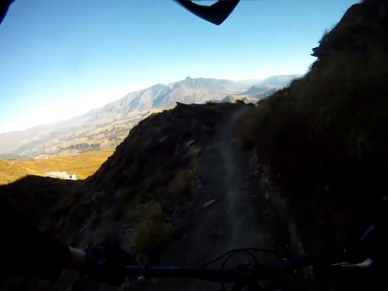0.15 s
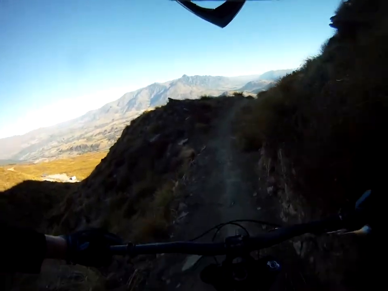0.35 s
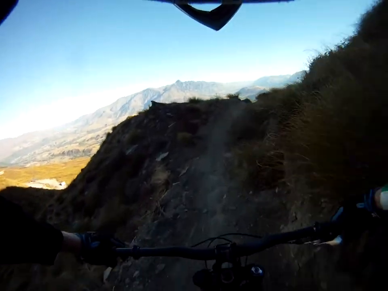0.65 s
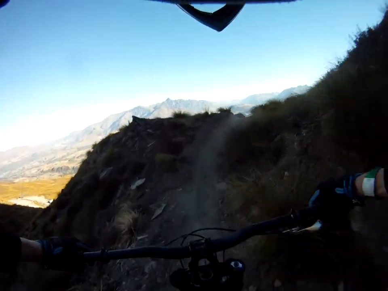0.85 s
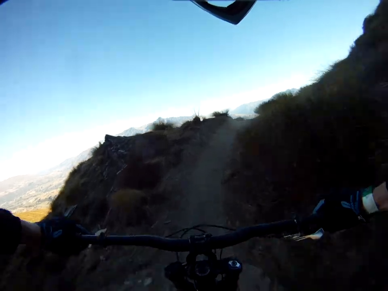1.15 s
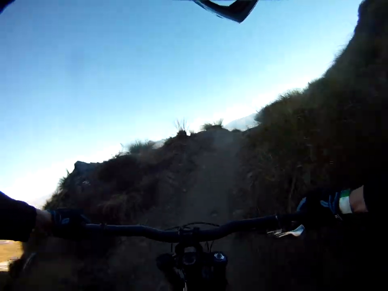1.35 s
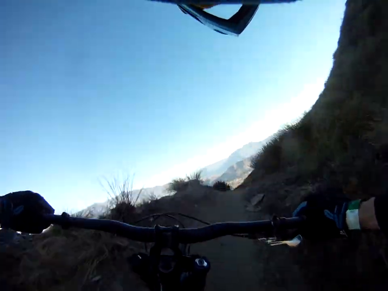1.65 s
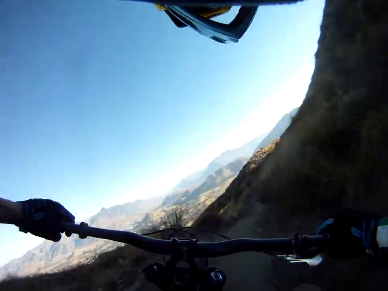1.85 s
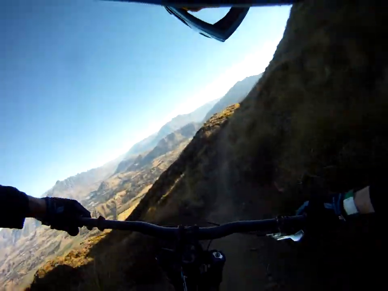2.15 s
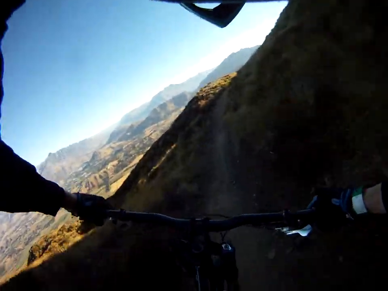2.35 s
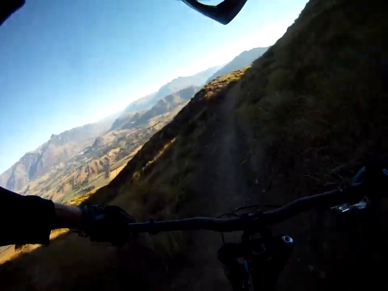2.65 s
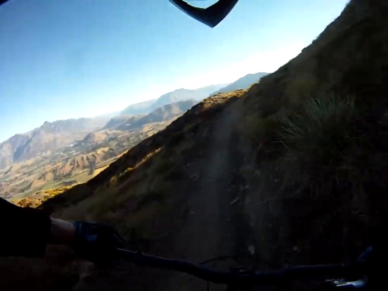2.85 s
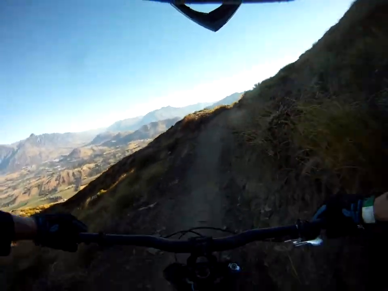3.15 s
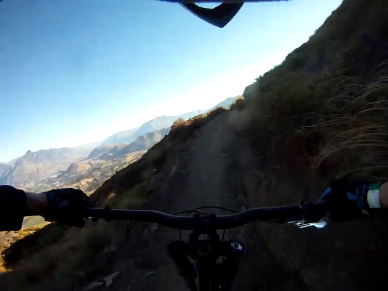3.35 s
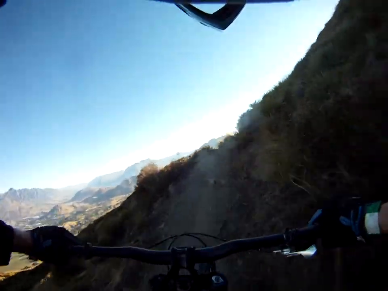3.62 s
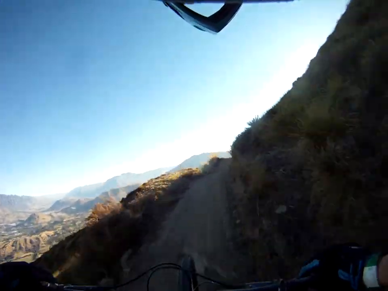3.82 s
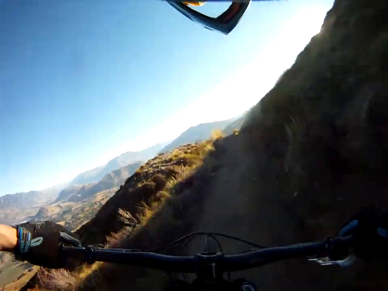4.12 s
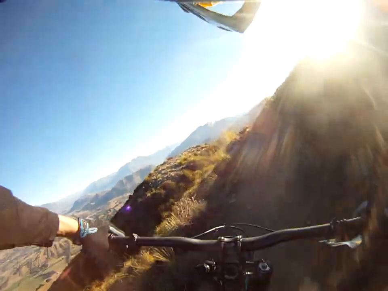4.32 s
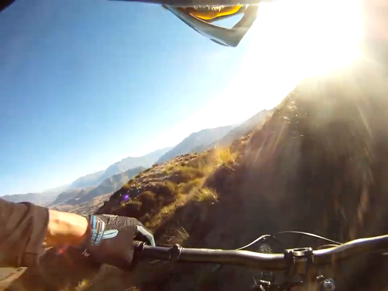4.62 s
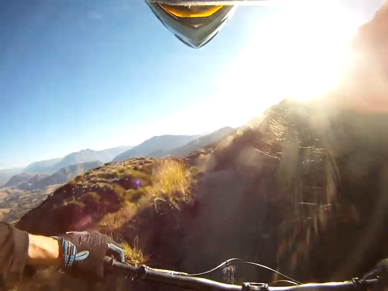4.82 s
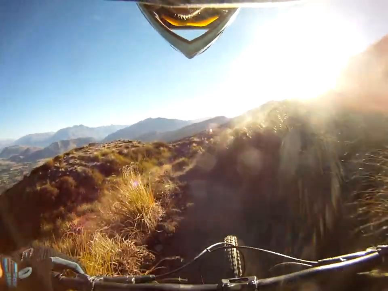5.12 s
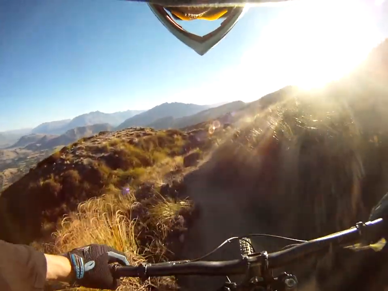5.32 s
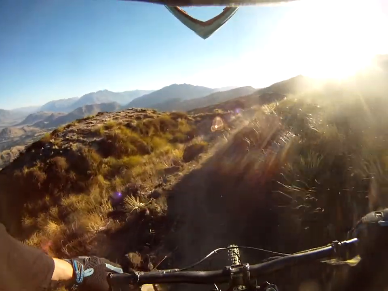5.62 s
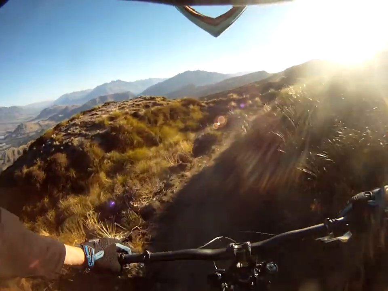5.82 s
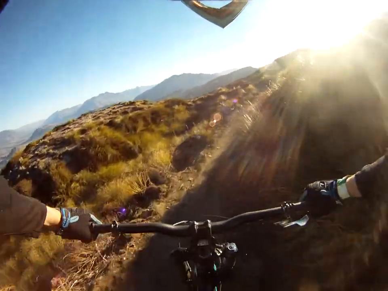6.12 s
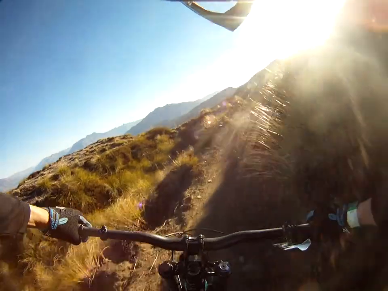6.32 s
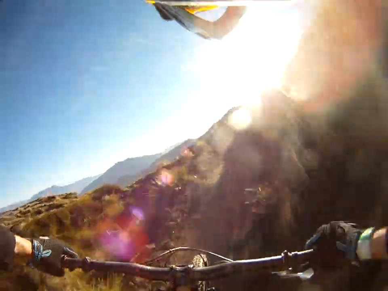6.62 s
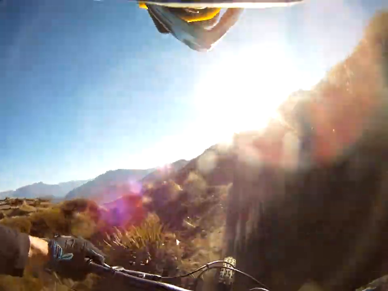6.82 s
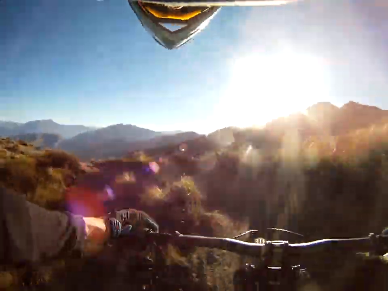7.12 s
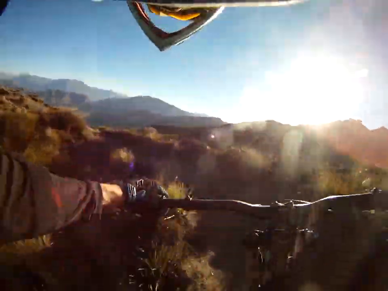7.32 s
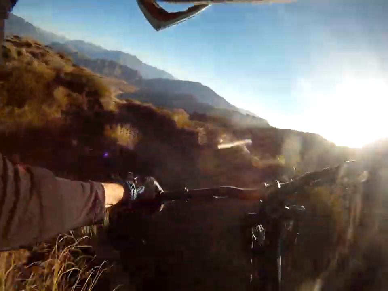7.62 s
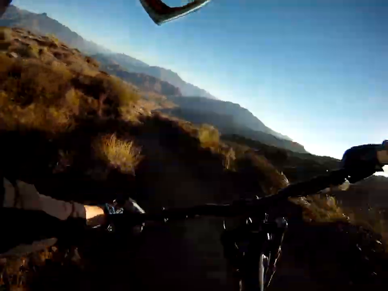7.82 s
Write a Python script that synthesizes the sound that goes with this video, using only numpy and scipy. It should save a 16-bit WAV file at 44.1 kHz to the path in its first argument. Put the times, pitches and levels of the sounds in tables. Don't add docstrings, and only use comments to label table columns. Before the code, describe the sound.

A mountain bike rushes down a dry dirt trail, wind thumping a boxed-in microphone while tyres rumble and crunch over grit and rattling stones.

```python
import sys
import numpy as np
from scipy import signal
from scipy.fft import rfft, irfft, next_fast_len
from scipy.io import wavfile
from scipy.ndimage import uniform_filter1d

SR = 44100
rng = np.random.default_rng(int(sys.argv[2]) if len(sys.argv) > 2 else 0)


def linear_from_db(decibels):
    return 10 ** (np.asarray(decibels, float) / 20)


def persist_wave(psi):
    counts = np.round(np.clip(psi, -1, 1) * 32767).astype(np.int16)
    wavfile.write(sys.argv[1], SR, np.atleast_2d(counts).T)


N = 351458

# pitch in Hz, level in dB, time to fade 60 dB in seconds.
WALL_MODES = [
    [(1033, 5.5, 0.0051), (1214, 0, 0.017), (1356, -5, 0.014), (1660, -3, 0.011)],
    [(1855, 0, 0.009), (2150, 4, 0.011), (2320, 1, 0.014), (2660, 4, 0.0087), (3110, -5.5, 0.017)],
    [(3500, 5.5, 0.0066), (3790, 1.5, 0.011), (4100, 0, 0.011), (4340, -6, 0.0079)],
]
# frequency in Hz, level in dB per Hz.
WIND_TONE = [(8.8, -26), (15, 0.5), (75, 5), (183, -6), (222, -10.5), (400, -19.5), (520, -29), (880, -120)]
# frequency in Hz, level in dB per Hz.
RUMBLE_TONE = [(71, -39), (120, -7), (264, -5), (312, -6.5), (419, -7), (655, -15.5), (781, -25.5),
               (1100, -30.5), (1430, -35), (2420, -120)]
# frequency in Hz, level in dB per Hz.
CRUNCH_TONE = [(470, -37), (800, -12), (965, -19), (1050, -12.5), (1170, -7), (1320, -11.5), (1750, -11.5),
               (2430, -8.5), (3010, 0), (3920, -15), (4200, -18.5), (5460, -19.5), (9240, -120)]
# frequency in Hz, level in dB per Hz.
DUST_TONE = [(2240, -13), (3800, -6), (4330, -1), (4770, 5), (5220, -9), (6000, -4), (7800, -42),
             (13200, -120)]
# time in seconds, wind pressure in dB.
AIRSPEED = [(0.0, -24), (.3, -21.5), (.62, -21.5), (1.2, -17.5), (1.5, -22.5), (1.95, -21), (2.1, -28),
            (2.5, -24.5), (3.0, -21.5), (3.5, -17.5), (3.95, -23), (4.45, -34), (4.65, -26.5), (5.85, -29),
            (6.17, -23), (6.6, -25.5), (7.05, -33.5), (7.97, -33)]
# centre in seconds, half length in seconds, swell in dB.
GUST_SWELLS = [(.03, 0.04, -4), (.17, 0.079, 5), (.62, 0.093, 5.5), (.83, 0.034, -9), (1.06, 0.031, 0),
               (1.11, .02, -6), (1.18, 0.075, 4), (1.24, 0.037, -1), (1.7, 0.085, -11), (1.89, 0.075, 2),
               (2.05, 0.043, -4.5), (2.4, 0.031, -4), (2.47, .06, 4), (2.57, 0.064, -2), (2.66, .05, 1),
               (2.82, 0.055, 4), (2.96, 0.053, -4), (3.04, 0.034, 4), (4.18, 0.04, -9), (4.28, .04, 6),
               (3.95, .1, -3), (2.3, .08, 2), (3.72, .05, -4), (4.33, .04, -8), (4.64, 0.047, 8),
               (5.27, 0.044, -9), (6.19, 0.025, -9), (6.26, .04, 5.5), (6.57, .02, -6), (6.68, .07, 5.5),
               (7.46, 0.043, -8), (7.57, 0.076, -2), (7.93, .05, 12)]
# time in seconds, load on the tyres in dB, looseness of the dirt in dB.
GROUND = [(0.0, -36, -49), (.3, -30, -42.5), (.65, -31.5, -43.5), (1.0, -29.5, -43.5), (1.6, -29, -43),
          (1.85, -35.5, -48.5), (2.1, -40, -52.5), (2.5, -34.5, -51.5), (2.8, -32, -50),
          (3.1, -30.5, -42.5), (3.66, -28.5, -44.5), (4.05, -34.5, -48), (4.9, -35, -48),
          (5.3, -39.5, -49.5), (5.85, -42.5, -52.5), (6.5, -29, -43.5), (7.3, -40, -51.5), (7.97, -35, -48)]
# centre in seconds, half length in
# seconds, extra rumble in dB, extra grit in dB.
STONES_HIT = [(.03, 0.045, 0.5, -3.5), (.09, .03, 7, 1), (.13, 0.032, 2, -8), (.21, 0.028, 3.5, 3),
              (.3, 0.037, 1.5, -0.5), (.62, 0.099, -2.5, -3), (.85, 0.043, 3.5, 3.5),
              (1.11, 0.015, 6, -4.5), (1.215, 0.024, 3.5, 7.5), (1.28, 0.026, 0, 3), (1.62, .05, 1.5, -1),
              (1.86, 0.02, -1, 9), (2.33, .05, -1.5, -1), (2.42, 0.077, 3, 3.5), (2.55, .03, -3, -4),
              (2.6, 0.052, -1.5, 5), (3.02, .08, 6, 0.5), (.33, .03, 0, -3), (2.33, .04, 4, 0),
              (2.75, .1, 0, 2), (3.975, .025, -3, -6), (4.13, .04, -10, 0.5), (4.24, .02, -2, -4),
              (4.325, .03, 0, 5), (4.367, .012, 0, -5), (4.54, .012, 0, -5), (6.41, .02, 0, -3),
              (6.69, .03, 0, -3), (7.03, .05, 3, 3), (7.265, .02, 0, -4), (4.185, .035, 9, 2.5),
              (4.28, 0.059, 5.5, 5.5), (4.46, 0.064, -1.5, 3.5), (4.59, 0.064, -5, -1),
              (4.93, 0.066, 2, 3.5), (5.02, 0.044, -1, 4.5), (5.29, 0.022, 2, 5), (5.46, 0.084, 0.5, 3),
              (6.275, .025, -2.5, 7.5), (6.46, 0.028, 0, 2), (6.6, .08, 7, 5), (7.46, .04, 1, 4.5)]
# start in seconds, thud level in dB, thud pitch in Hz,
# sharpness (tick over thud) in dB.
MOUNT_THUDS = [(.014, -20.5, 630, -13), (.0905, -22, 600, -8), (.209, -24.5, 450, -11),
               (.254, -21.5, 554, -15), (.89, -20.5, 480, -9), (2.099, -29, 510, -4),
               (2.17, -34.5, 744, -18), (2.25, -29.5, 434, -22), (2.84, -24, 510, -10),
               (3.507, -29, 620, -10), (3.904, -31, 524, -4), (4.085, -36, 756, -1), (4.19, -23, 530, -9),
               (4.299, -26, 634, -18), (4.3205, -15, 497, -22), (4.444, -27.5, 480, -16),
               (4.572, -31, 510, -7), (5.241, -22.5, 645, -10.5), (5.476, -27, 463, -21),
               (5.668, -33.5, 805, -21), (5.912, -27.5, 804, -4.5), (6.095, -26, 743, -12),
               (6.491, -25, 570, -11), (6.521, -13.5, 626, -14), (6.885, -30, 535, -8),
               (6.978, -33, 664, -6), (7.072, -23, 640, -13), (7.228, -19.5, 643, -10.5),
               (7.498, -18, 640, -8), (7.8, -28, 530, -24)]
# start in seconds, tick level in dB, clack over tick in dB,
# snap over tick in dB.
WALL_RAPS = [(.133, -33, -2, 1), (1.286, -29.5, 0.5, 5), (2.085, -18.5, -4.5, -17), (3.025, -29, -18, -10),
             (3.674, -40, 0, 8), (3.999, -28, -3, -14), (4.044, -31, -5, 1.5), (4.262, -27, -3, -6),
             (4.549, -15.5, -6.5, -13), (4.788, -34, -9, -14), (4.827, -32, -20, -16),
             (4.892, -31, -19, -3), (5.05, -36, -16, -2), (5.747, -26.5, -2, -28), (6.431, -22, -10, -5),
             (6.567, -18, -9, -8), (6.5735, -9, -7, 5), (6.589, -29, -11, -17), (6.6125, -23, -16, -12)]
# start in seconds, snap level in dB, tick over snap in dB.
CABLE_FLICKS = [(.155, -30, -8), (.171, -33, -8), (.238, -34, -6), (.288, -30, -8), (1.19, -30, -10),
                (1.861, -30.5, -5.5), (3.313, -30, -13), (4.379, -37, -9), (5.284, -42, 2),
                (6.268, -27, -9), (6.46, -31, -11), (7.449, -41, -11)]
# start in seconds, level in dB, centre in Hz, width in Hz,
# length in seconds.
LOOSE_SCRAPES = [(0.151, -41.5, 3900, 2500, 0.027), (0.256, -42, 4800, 2500, .014),
                 (.286, -35, 4500, 2400, 0.009), (0.816, -41, 5000, 2500, 0.048),
                 (1.459, -42, 3800, 3000, 0.054), (2.97, -37, 2600, 895, 0.018),
                 (2.993, -39, 2600, 700, 0.015), (3.042, -37, 2500, 1300, 0.017),
                 (4.188, -43, 4400, 1400, .012), (4.257, -41, 2780, 2000, 0.032),
                 (6.514, -33.5, 2940, 2500, .02), (6.576, -27, 2630, 2800, 0.011),
                 (6.566, -25, 2900, 2600, 0.0084), (6.588, -31, 2500, 1400, 0.011),
                 (6.593, -39, 2480, 2500, 0.043)]
# start in seconds, peak level in dB.
PEBBLE_CRACKS = [(0.0902, -24), (0.9158, -21), (1.1887, -25), (1.2126, -28), (1.286, -14), (1.3648, -17),
                 (1.4885, -27), (1.6302, -22), (2.2244, -34), (2.706, -22), (3.076, -26), (3.2824, -17),
                 (3.3244, -33), (3.5544, -31), (3.6726, -22), (3.7649, -15.5), (4.4568, -32), (5.1777, -33),
                 (6.432, -14), (6.449, -20), (6.4607, -12), (6.5344, -24), (6.6044, -17)]
# start in seconds, peak level in dB, pitch in Hz.
SHORT_PINGS = [(.091, -25, 2950), (.173, -26, 3000), (.209, -29, 2900), (.367, -27, 3200),
               (.387, -26, 3000), (.451, -28, 2900), (.519, -28, 3000), (1.144, -28, 3000),
               (1.212, -26, 3100), (1.286, -25, 3250), (3.791, -22, 3000), (4.044, -28, 1500),
               (4.262, -26, 1300), (6.574, -19, 1600), (6.612, -18.5, 1350), (3.999, -23, 2700),
               (4.087, -32, 1150), (3.676, -27, 3400), (6.978, -31, 1280), (7.136, -35, 1200),
               (.155, -27, 3200), (.238, -28, 3500), (.261, -30, 3000), (.489, -32, 3080),
               (.588, -31, 3030), (.65, -30, 3140), (.72, -30, 2900), (.788, -31, 3060),
               (.8435, -27, 3140), (.916, -27, 2940), (1.038, -30, 2690), (1.09, -31, 2890),
               (1.125, -31, 3070), (1.165, -29, 2800), (1.189, -28, 2960), (1.212, -30, 4600),
               (1.252, -31, 2800), (1.313, -27, 2760), (1.365, -29, 3420), (1.429, -30, 2670),
               (1.47, -29, 2290), (1.489, -27, 2700), (2.947, -31, 2760), (2.972, -27, 2380),
               (2.982, -30, 2900), (2.997, -26, 2240), (3.015, -27, 3200), (3.024, -23, 2740),
               (3.046, -29, 2700), (3.077, -29, 1300), (3.0945, -30, 2000), (3.141, -29, 2970),
               (4.126, -30, 3000), (4.283, -32, 3100), (4.572, -29, 1150), (6.519, -25, 2190),
               (6.594, -28, 2400), (6.605, -28, 2300), (6.63, -30, 2600), (6.679, -34, 2210)]
# start in seconds, peak level in dB, pitch in Hz.
HEAVY_JOLTS = [(0.207, -8.5, 56), (0.678, -20, 40.8), (0.859, -8, 79), (1.038, -4.5, 57.7),
               (1.998, -11.5, 48.4), (2.434, -14.5, 109), (2.648, -10, 86), (2.849, -23, 59.2),
               (3.498, -13.5, 202), (3.568, -10, 43.1), (3.998, -13.5, 182), (4.189, -9.5, 343),
               (4.319, -15, 70.0), (4.596, -13, 64), (5.051, -13, 323), (6.249, -19, 53.8),
               (6.4305, -13, 520), (6.492, -17, 300), (6.628, -17, 330), (4.163, -22, 420),
               (4.264, -20, 600), (4.287, -17, 150), (3.094, -16, 300), (7.757, -18, 260), (7.905, -17, 70)]
# start in seconds, level in dB, pitch in Hz, length in seconds.
BRAKE_SQUEAKS = [
    (1.563, -36.5, 962, 0.051),
    (6.456, -26, 966, 0.022),
    (6.483, -38, 966, .013),
]
SQUEAK_HARMONICS = [-8, -14, -1, -15, -14]


def wind():
    eddies = rng.standard_normal(N) * linear_from_db(1.7 * wander(5.8, 26.0))
    strength_db = 0.02 + curve(AIRSPEED, axis=1) + humps(GUST_SWELLS, axis=2)
    return linear_from_db(strength_db) * colour(eddies, WIND_TONE)


def tyres():
    sink = np.arange(N) * 150.0 / SR
    stones = np.maximum.accumulate(wander(2.6, 56.0) + sink) - sink
    stones = evened(stones - stones.mean())

    rumble = rng.standard_normal(N) * linear_from_db(0.99 * stones + 1.56 * wander(3.8, 72.0))
    rumble = colour(patchy(rumble, 2.03, frames=10, bins=2), RUMBLE_TONE)
    load_db = 2.5 + curve(GROUND, axis=1) + humps(STONES_HIT, axis=2)

    grains = linear_from_db(4.9 * np.minimum(rng.exponential(1, N), 5))
    grains = grains * (rng.random(N) < 900 / SR) * rng.choice([-1, 1], N)
    crunch = rng.standard_normal(N) + 0.24 * evened(grains)
    crunch = crunch * linear_from_db(2.2 * stones + 0.49 * wander(7.6, 62.0))
    crunch = colour(patchy(crunch, 1.8, frames=8, bins=6), CRUNCH_TONE)

    dust = rng.standard_normal(N) * linear_from_db(1.8 * stones + 2.2 * wander(6.5, 77.0))
    dust = colour(dust, DUST_TONE)
    dust_gain = loose_dirt(-8.5, stone_jump=1.64)
    return linear_from_db(load_db) * rumble + crunch_gain() * crunch + dust_gain * dust


def loose_dirt(offset_db, stone_jump):
    return linear_from_db(offset_db + curve(GROUND, axis=2) + stone_jump * humps(STONES_HIT, axis=3))


def crunch_gain():
    return loose_dirt(3.5, stone_jump=1)


def blows():
    rows = []
    for s, thud_db, thud_hz, sharp in MOUNT_THUDS:
        tick_db = thud_db + sharp
        rows.append((s, thud_db, thud_hz, tick_db - 2, tick_db, tick_db - 10))
    for s, tick_db, clack, snap in WALL_RAPS:
        rows.append((s, -18 + 0.4 * tick_db, 552, tick_db + clack, tick_db, tick_db + snap))
    for s, snap_db, tick in CABLE_FLICKS:
        rows.append((s, snap_db - 13, 497, snap_db - 17.0, snap_db + tick, snap_db))
    return rows


def knocks():
    out, t = np.zeros(N), np.arange(2000) / SR
    rows = blows()
    rattles = rng.standard_normal((len(rows), 400)) * linear_from_db(-60 * t[:400] / 0.015)
    contact = signal.windows.hann(9)
    slap_band = signal.butter(2, [900.0, 2800.0], "bandpass", fs=SR, output="sos")
    for (s, thud_db, thud_hz, *levels_db), rattle in zip(rows, rattles):
        blow = np.convolve(0.1 * rattle + signal.unit_impulse(400), contact)

        slap = signal.sosfilt(slap_band, blow)
        add(out, s, linear_from_db(levels_db[1] - 4.5) * -slap / abs(slap).max())

        thud = linear_from_db(-60 * t / 0.022) * np.sin(2 * np.pi * thud_hz * t)
        thud -= linear_from_db(-14.0 - 60 * t / 0.033) * np.sin(2 * np.pi * 870.0 * t)
        thud *= (1 - np.exp(-t / 0.0006)) ** 2
        add(out, s + 0.0002, linear_from_db(thud_db + 4.0) * thud / abs(thud).max())

        detune = 1 + 0.012 * np.clip(rattle[0], -2, 2)
        for family, level_db in zip(WALL_MODES, levels_db):
            ring = np.zeros(len(t))
            for k, (hz, db, t60) in enumerate(family):
                ring += (-1) ** k * linear_from_db(db - 60 * t / t60) * np.sin(2 * np.pi * hz * detune * t)
            ring = signal.fftconvolve(ring, blow)
            add(out, s, linear_from_db(level_db + 2.5) * ring / abs(ring).max())
    return out


def pebbles():
    out, t = np.zeros(N), np.arange(300) / SR
    bright = signal.butter(2, 3000.0, "highpass", fs=SR, output="sos")
    bursts = rng.standard_normal((len(PEBBLE_CRACKS), 300)) * linear_from_db(-60 * t / 0.0072)
    cracks = signal.sosfilt(bright, bursts)
    for (s, db), crack in zip(PEBBLE_CRACKS, cracks):
        add(out, s, linear_from_db(db + 3.0) * crack / abs(crack).max())

    grit = np.zeros(N)
    for hz in np.geomspace(2100.0, 3900.0, num=10):
        hits = linear_from_db(2.4 * np.minimum(rng.exponential(1, N), 3)) * (rng.random(N) < 45.0 / SR)
        ring = linear_from_db(-60 * t / 0.012) * np.sin(2 * np.pi * hz * t)
        grit += signal.oaconvolve(hits, ring)[:N]
    return out + linear_from_db(-10.0) * crunch_gain() * evened(grit)


def scrapes():
    out = np.zeros(N)
    grit = rng.standard_normal((len(LOOSE_SCRAPES), 6000))
    for (s, db, hz, width, length), noise in zip(LOOSE_SCRAPES, grit):
        band = [max(hz - width / 2, 100), hz + width / 2]
        sos = signal.butter(3, band, "bandpass", fs=SR, output="sos")
        puff = evened(signal.sosfilt(sos, noise * abs(noise)))[:int(length * SR)]
        add(out, s, linear_from_db(db) * puff * signal.windows.tukey(len(puff), 0.5))
    return out


def squeaks():
    out = np.zeros(N)
    for s, db, hz, length in BRAKE_SQUEAKS:
        t = np.arange(int(length * SR)) / SR
        stack = np.zeros(len(t))
        for k, harmonic_db in enumerate(SQUEAK_HARMONICS, start=1):
            stack += linear_from_db(harmonic_db) * np.sin(2 * np.pi * k * hz * t)
        add(out, s, linear_from_db(db) * stack * signal.windows.tukey(len(t), 0.5))
    return out


def jolts():
    out = np.zeros(N)
    for s, db, hz in HEAVY_JOLTS:
        turns = np.arange(int(2 * SR / hz)) * hz / SR
        swell = np.sin(np.pi * turns / 2) * linear_from_db(-3.0 * turns)
        add(out, s, linear_from_db(db) * np.sin(2 * np.pi * turns) * swell)
    return out


def pings():
    out, t = np.zeros(N), np.arange(1200) / SR
    for s, db, hz in SHORT_PINGS:
        fade = linear_from_db(db + 4.0 - 60 * t / 0.015)
        add(out, s, fade * np.sin(2 * np.pi * hz * t) * (1 - np.exp(-t / 0.0004)))
    return out


def evened(x):
    return x / np.sqrt(np.mean(x ** 2) + 1e-20)


def colour(x, spectrum):
    size = next_fast_len(N)
    f, db = np.transpose(spectrum)
    log_f = np.log(np.fft.rfftfreq(size, 1 / SR) + 1)
    gain = linear_from_db(np.interp(log_f, np.log(f + 1), db, -80, -80))
    return evened(irfft(rfft(x, size) * gain, size)[:N])


def wander(low_hz, high_hz):
    sos = signal.butter(1, [low_hz, high_hz], "bandpass", fs=SR, output="sos")
    return evened(signal.sosfilt(sos, rng.standard_normal(N)))


def patchy(x, depth_db, frames, bins):
    z = signal.stft(x, nperseg=512)[2]
    field = uniform_filter1d(rng.standard_normal(z.shape), bins, 0)
    field = uniform_filter1d(field, frames, 1)
    return signal.istft(z * linear_from_db(depth_db * evened(field)), nperseg=512)[1][:N]


def curve(rows, axis):
    rows = np.array(rows)
    return np.interp(np.arange(N) / SR, rows[:, 0], rows[:, axis])


def humps(rows, axis):
    out = np.zeros(N)
    for row in rows:
        centre, half = row[0], row[1]
        add(out, max(centre - half, 0), row[axis] * signal.windows.hann(int(2 * half * SR)))
    return out


def add(mix, s, sound):
    part = mix[round(s * SR):][:len(sound)]
    part += sound[:len(part)]


def scene():
    mix = wind() + tyres() + knocks() + pebbles() + scrapes() + squeaks() + jolts() + pings()
    return mix[None]


def low_pass(x):
    return signal.sosfilt(signal.butter(12, 16100, fs=SR, output="sos"), x)


def record(dry):
    slow = signal.resample_poly(dry[0], 40, 147, window=("kaiser", 8))
    held = signal.resample_poly(np.repeat(slow, 4), 147, 160, window=("kaiser", 8))[:N]
    held = held + linear_from_db(-67.0) * rng.standard_normal(len(held))
    held = np.pad(held, (0, N - len(held)))
    edge = signal.firwin(201, 15300, window=("kaiser", 6), fs=SR)
    finished = np.clip(signal.oaconvolve(held, edge, "same"), -1, 1)
    return low_pass(finished[None])


dry = scene()
out = record(dry)
persist_wave(out)
```